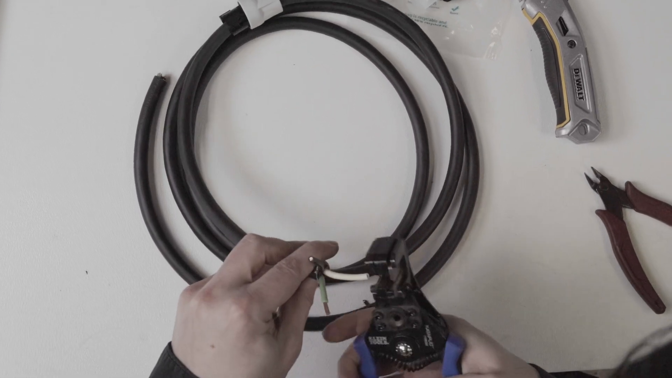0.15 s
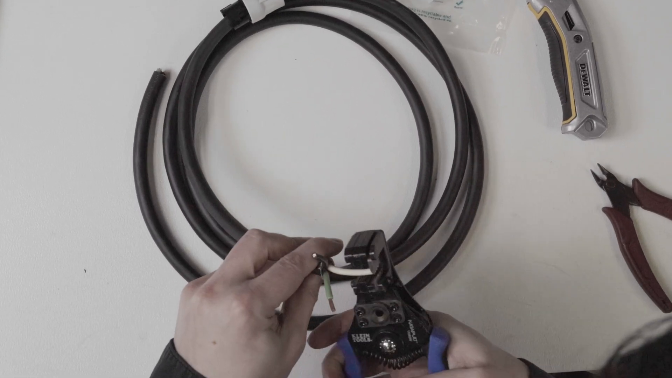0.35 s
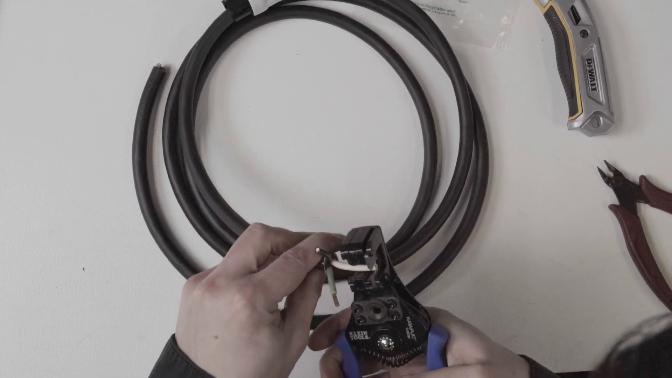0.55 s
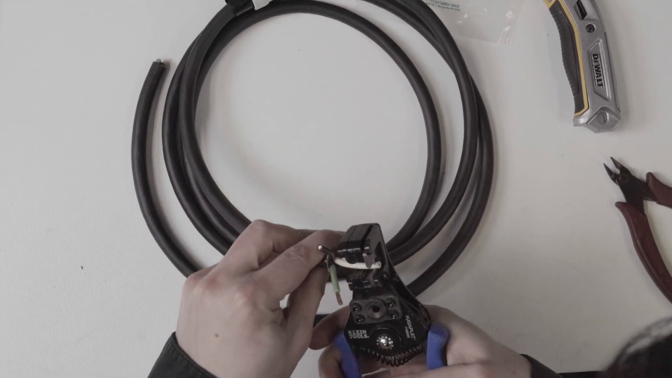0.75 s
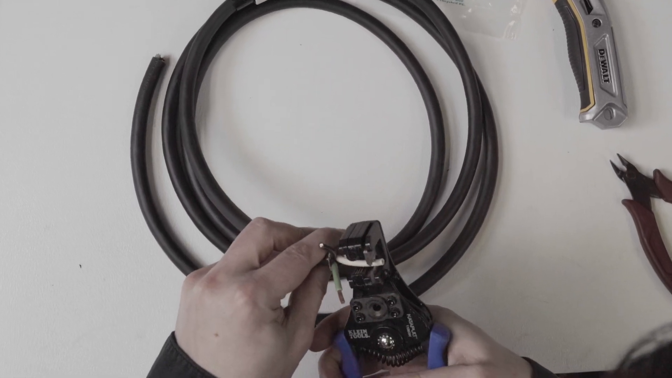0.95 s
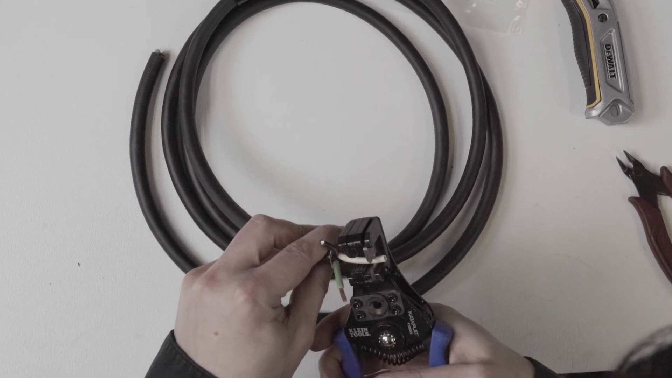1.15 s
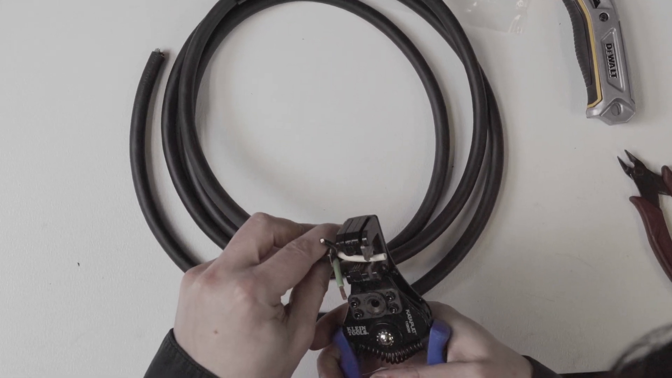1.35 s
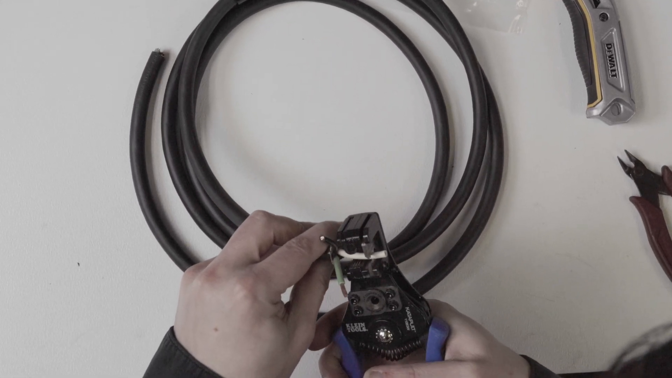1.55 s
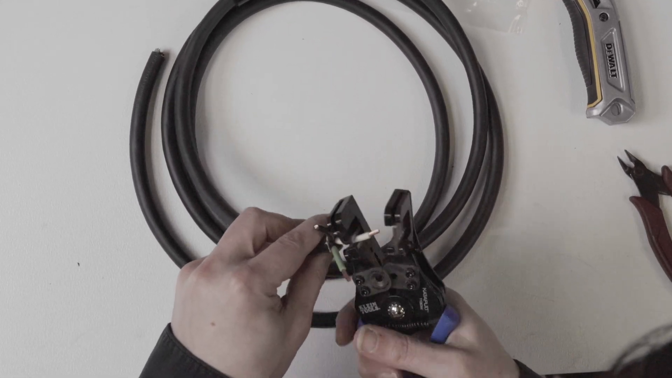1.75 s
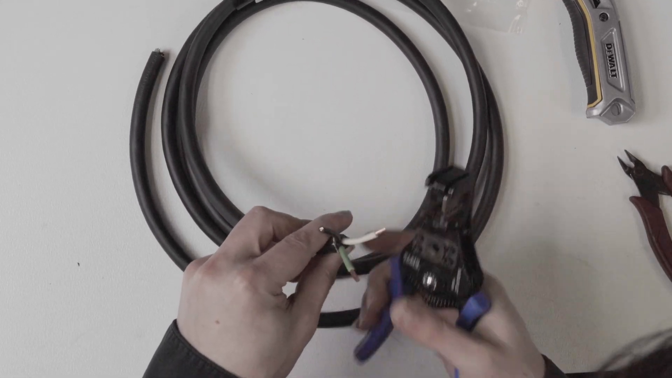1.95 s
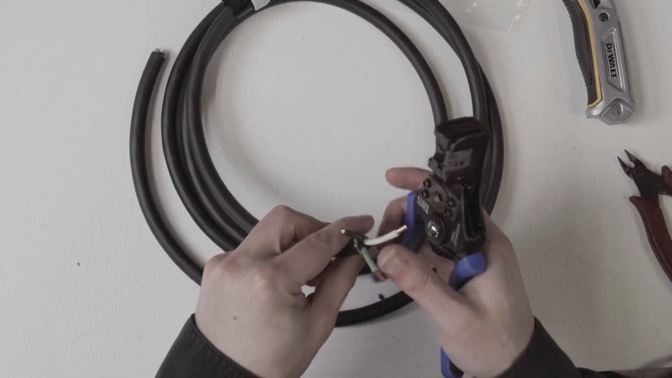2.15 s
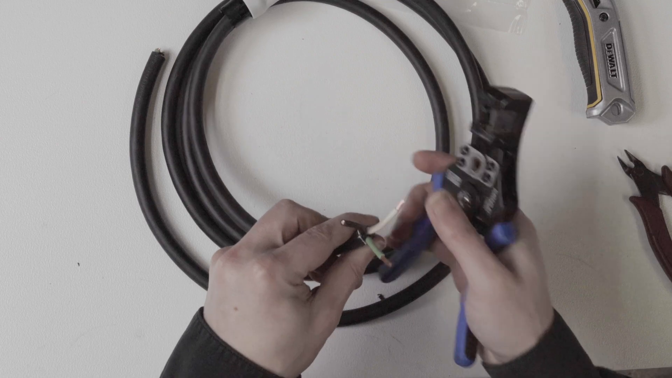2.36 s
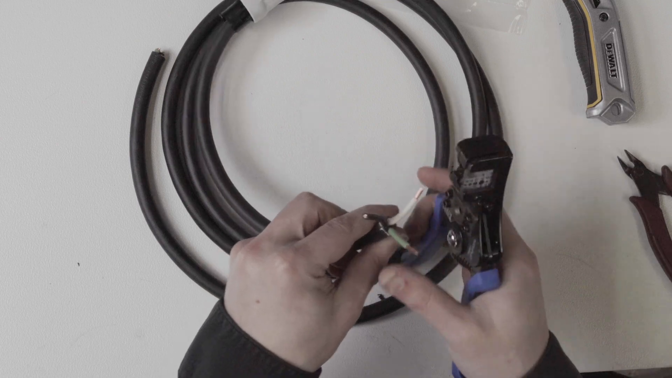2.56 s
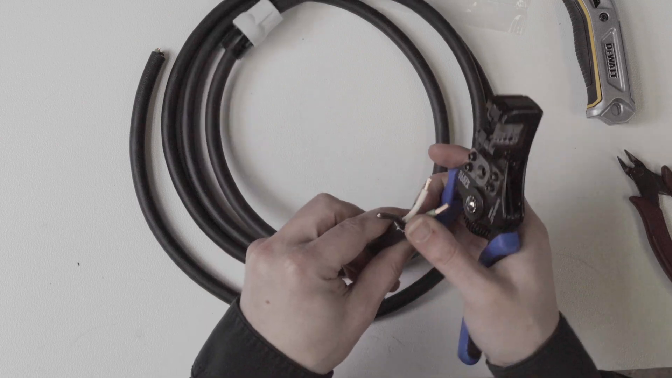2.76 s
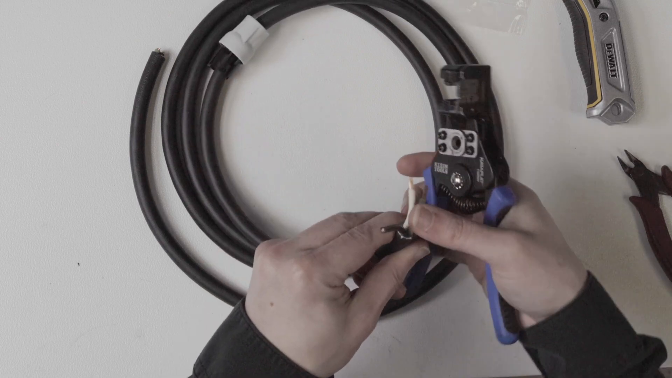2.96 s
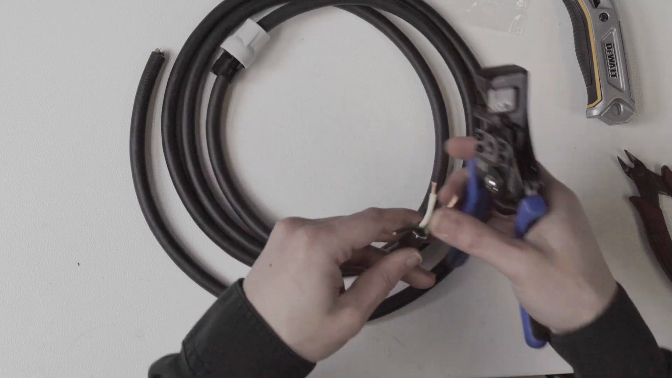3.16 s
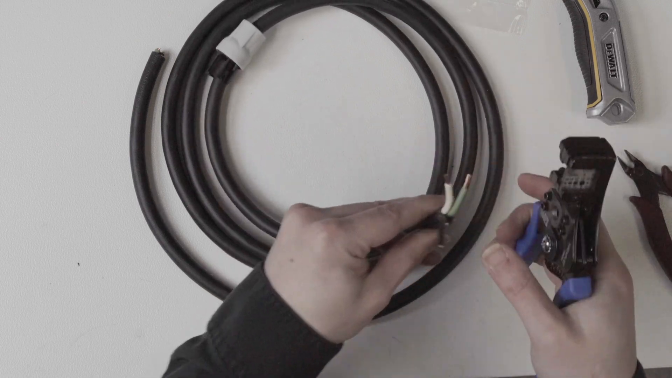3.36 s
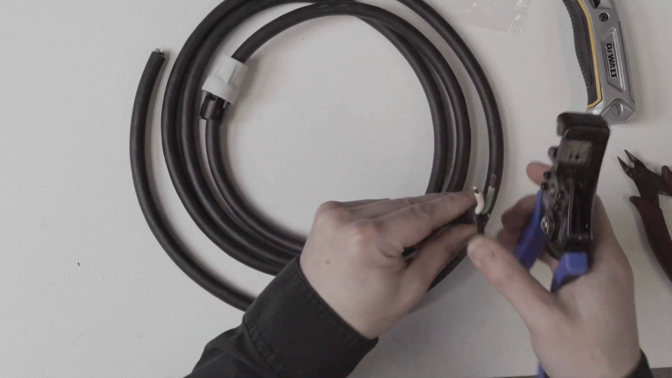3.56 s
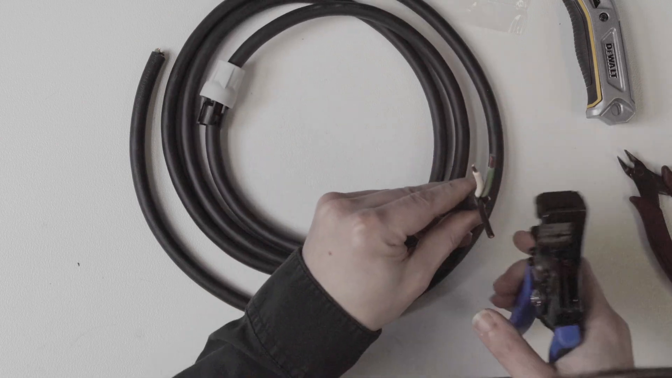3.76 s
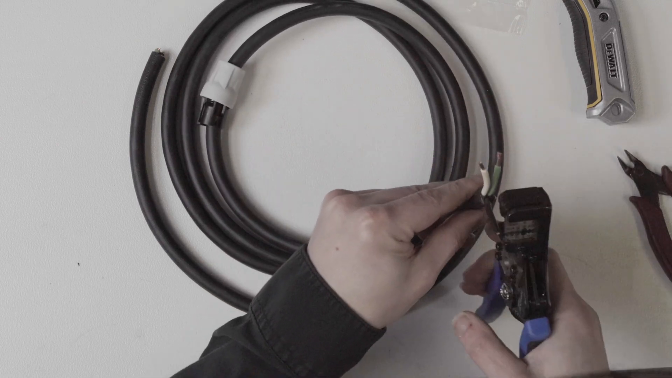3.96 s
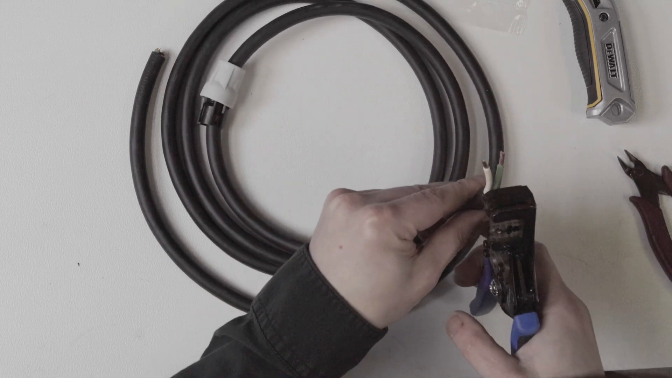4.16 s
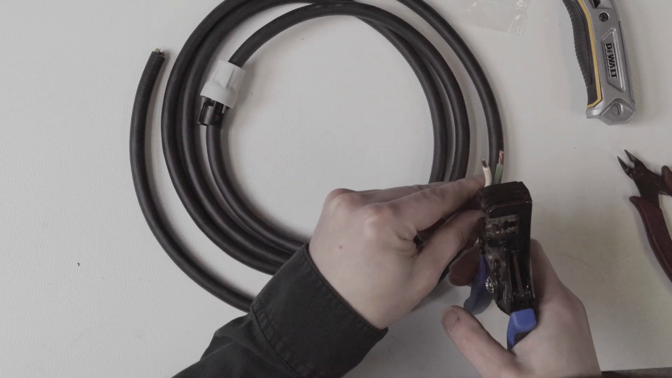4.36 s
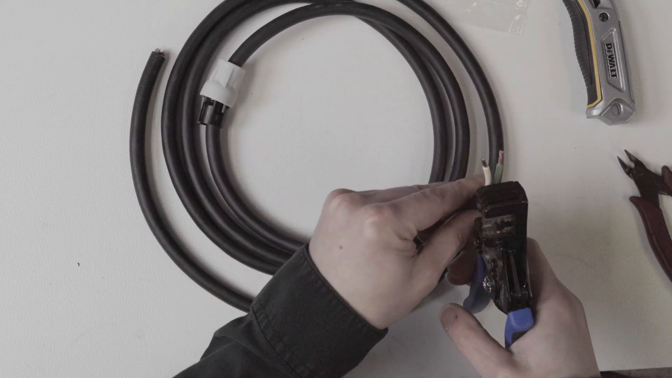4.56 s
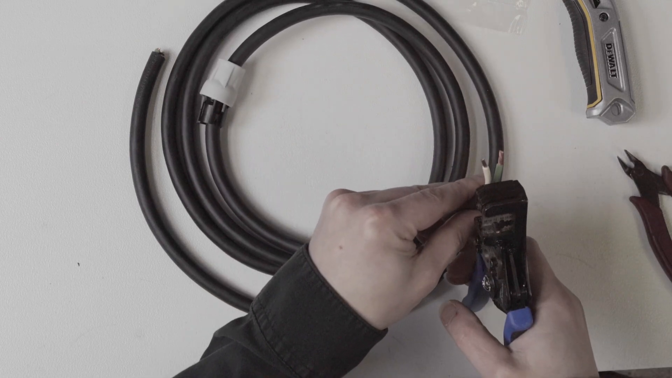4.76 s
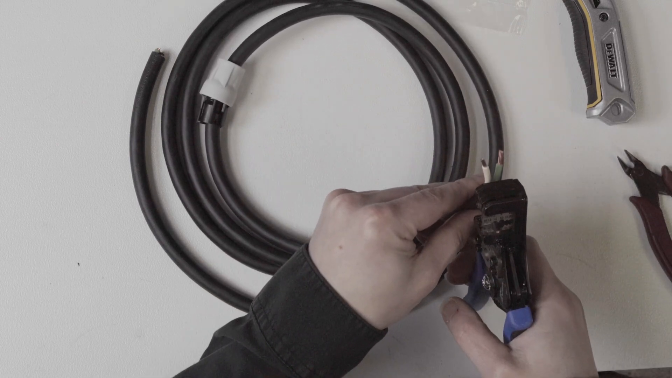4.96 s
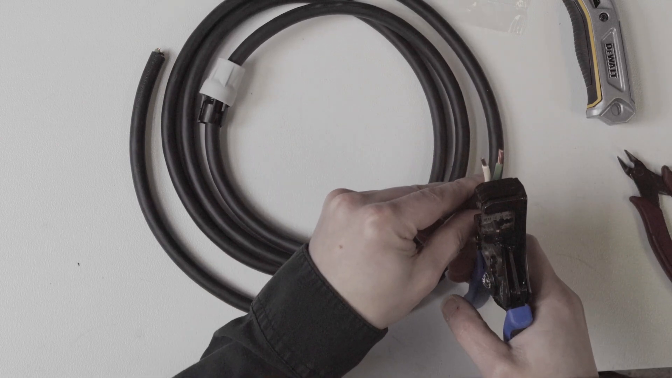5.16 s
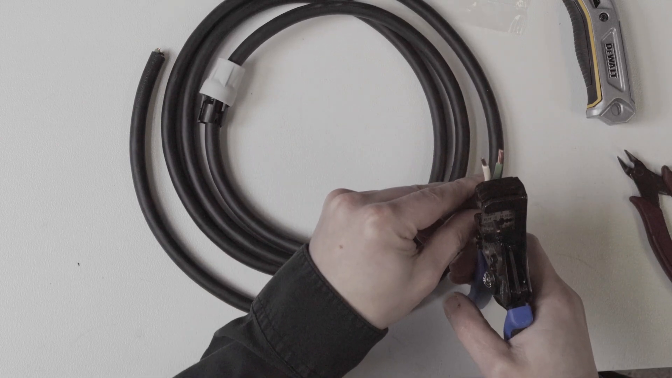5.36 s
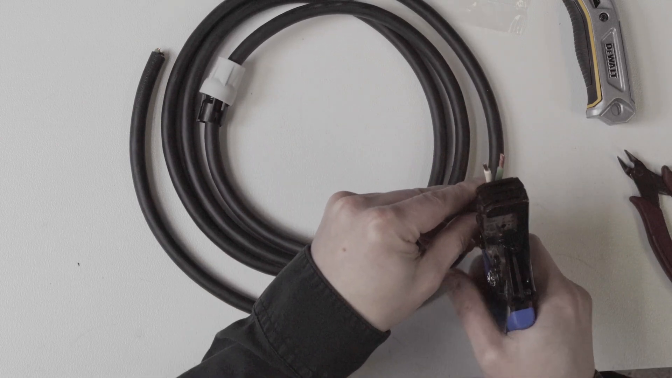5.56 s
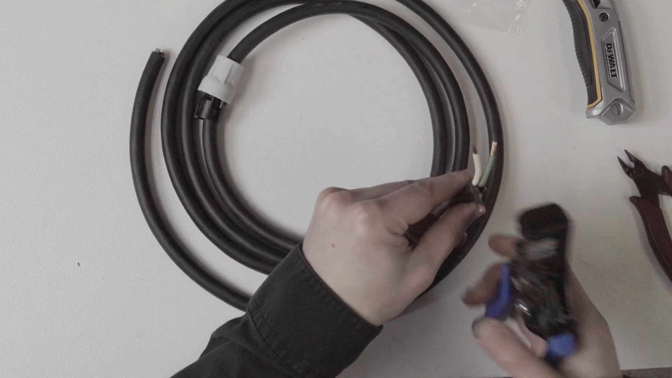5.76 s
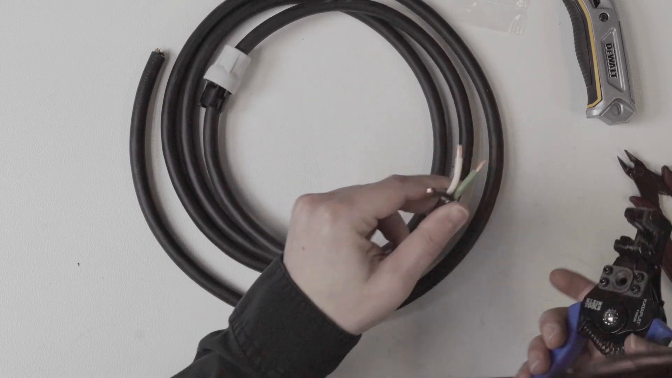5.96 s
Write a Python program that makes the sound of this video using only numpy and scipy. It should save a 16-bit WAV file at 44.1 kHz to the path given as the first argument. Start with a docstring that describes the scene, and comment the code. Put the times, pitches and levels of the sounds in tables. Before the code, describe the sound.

Two sharp metallic snap-and-slam strokes of a spring-loaded stripping tool, four seconds apart, amid tiny ticks in a hushed small room.

```python
"""Faint hum and light clicks of a hand tool, then a hard snap, a rattle and a slam; the stroke comes twice.
A spring-loaded wire stripper is worked over a table in a small, dry room.
Snaps, slams and ticks are shaped noise bursts plus damped modes of jaws and steel frame.
Between strokes the tool ticks and rattles and the cable scuffs the table (trains of tiny slips).
The hum is one sine that swells and fades; the air is coloured noise."""
import sys
import numpy as np
from scipy import signal
from scipy.fft import rfft, irfft, next_fast_len
from scipy.io import wavfile

SR = 44100
rng = np.random.default_rng(int(sys.argv[2]) if len(sys.argv) > 2 else 0)


def wav_record(signal):
    """Record a signal, one row per channel, as 16-bit PCM in the file named by sys.argv[1]."""
    frames = np.transpose(np.atleast_2d(signal))
    bounded = np.clip(frames, -1, 1)
    # unit amplitude maps onto the largest positive 16-bit level
    quanta = np.round(bounded * 32767).astype(np.int16)
    wavfile.write(sys.argv[1], SR, quanta)


N = 264600

# Event levels are relative; snaps, slams and ticks add a shared gain.
# Decays and build-ups are time constants.
# Insulation tears, jaws fly open: start_s, level_db, build_s, decay_s, clack_db, jolt_db, sway_db
SNAPS = [(1.7868, -8, .001, 0.0011, -4, -30.5, -50.5), (5.6599, -12.5, 0.00044, .0029, 2.5, -46, -49.5)]
# Spectrum of the tear: freq_hz, level_db
SNAP_COLOUR = [(100, -13.5), (700, -13.5), (1200, -12.5), (2300, -3), (3800, -9.5), (5000, -10.5),
               (6600, -3.5), (9000, -8), (12000, -5), (13400, -4.5), (16000, -13)]
# Jaw resonances, one list per snap, set by how far the jaws are open: freq_hz, width_hz, level_db
JAW_MODES = [
    [(1274.4, 207, -5), (2130, 190, -0.5), (2370, 67, 2), (3306, 87, 0.5), (5192, 110, -3.5),
     (7850, 160, -4.5), (8490, 400, -4), (10466, 270, -6.5), (12000, 220, -1.5)],
    [(785, 85, -14.5), (1157, 74, -11), (2010, 170, -3.5), (2430, 180, 1), (4230, 140, -5), (6370, 410, -8),
     (7540, 250, -2.5), (8460, 220, -2.5), (9300, 150, -2), (10270, 140, -2)],
]
# Spring slams the steel jaws shut: start_s, level_db, decay_s, ring_db, chatter_db, jolt_db, sway_db
SLAMS = [(1.9182, -1, 0.0015, -13, -7, -48, -65.5), (5.7894, -2.5, 0.0018, -15.5, -7, -46.5, -36.5)]
# Spectrum of the blow, one list per slam: freq_hz, level_db
SLAM_COLOURS = [
    [(100, -18), (1200, -17), (2100, -13.5), (2550, -1.5), (3300, -7.5), (4400, -9.5), (5900, -2),
     (7100, -3.5), (7750, 0), (9600, -7.5), (10800, 0), (11900, -11.5), (13000, -3.5), (15000, -8)],
    [(100, -12), (1300, -23.5), (2400, -10), (3700, -10), (5200, -12.5), (6600, 0.5), (8200, -3.5),
     (9700, -9), (10700, -3), (12800, -8.5), (14600, -1), (16000, -13.5)],
]
# Linkage catches passed on each return: before_slam_s, level_db, decay_s, tilt_db_per_octave
CATCHES = [(.045, -36, .003, 4), (.0368, -27, 0.0018, 6.5), (.0275, -17.5, .0017, 5),
           (.0112, -27, .003, 4.5), (.005, -30, .003, 3)]
# Modes of the steel frame: freq_hz, level_db, t60_s
STEEL_MODES = [(2414, -8, .06), (2649, -1, .09), (3239, -4, .11), (3928, -3, .1), (5253, -5, .11),
               (5895, 0, .07), (6220, -4, .1), (6796, -1, .08), (7778, 1, .06), (8190, -4, .09),
               (10600, 0, .06), (12645, 1, .08), (12930, -2, .06), (14320, -2, .06), (14935, -3, .07)]
# Single clicks of the tool in the hand: start_s, level_db, decay_s, tilt_db_per_octave, clack_db
TICKS = [(.0773, -42.5, 0.00075, 1.5, -13), (.564, -53, 0.0016, 10.5, -14), (.809, -59, 0.00091, 5, -26),
         (1.7111, -35.5, 0.002, -1.5, -4), (1.7205, -38.5, .0016, 0, -11), (2.0511, -43, 0.0011, 1, -17),
         (2.2041, -51.5, 0.0031, -5.5, -10.5), (2.2691, -42.5, .0019, 6.5, -17),
         (2.325, -49.5, .004, 2, -10), (2.3987, -50, 0.0023, .5, -9.5), (3.682, -56, .0016, -2, -16),
         (4.121, -60.5, .0011, -2.5, -2), (4.474, -57.5, 0.0009, 0, -18), (5.436, -56.5, 0.0049, -2, -8),
         (5.5532, -44.5, .0017, 12, -26), (5.6003, -42, 0.0019, -3.5, -9),
         (5.9392, -32.5, .0018, 1.5, -0.5)]
# Spectrum of a light contact: freq_hz, level_db
TICK_COLOUR = [(200, -15.5), (1400, -14.5), (2500, -1.5), (3800, -2), (5200, -2.5), (7500, -4), (10000, -5),
               (15500, -12)]
# Grip shifts, loose parts rattle: start_s, length_s, level_db, tilt_db_per_octave
RATTLES = [(0.067, 0.045, -59, -3), (1.699, 0.05, -58, -5), (2.26, .06, -55, -1), (2.93, .37, -58, -2),
           (5.529, .11, -56.5, -3)]
# Cable and sleeve slide on the table: start_s, length_s, level_db, tilt_db_per_octave
SCUFFS = [(0.494, .005, -64, -3.5), (0.538, 0.0077, -65.5, -7), (2.856, .017, -50, 1.9),
          (2.866, 0.12, -64, -3), (3.125, 0.058, -63, -4), (3.416, 0.32, -72, -0.5),
          (3.473, 0.15, -63.5, 0.5), (3.68, 0.032, -63, 1), (5.041, .04, -72, -5)]
# Spectrum of the sliding: freq_hz, level_db
SCUFF_COLOUR = [(100, -7.5), (280, 2.5), (450, -5), (800, -2), (1600, -7.5), (2750, -8.5), (3400, -20),
                (7000, -18), (14000, -45)]
# Swell of the hum, before and after the first stroke: time_s, level_db
HUM_SWELL = [
    [(0.0, -62), (0.406, -69), (0.668, -62.5), (1.036, -72), (1.308, -91), (1.492, -69), (1.74, -79.5)],
    [(2.05, -71), (2.83, -80), (4.38, -65), (4.72, -69), (5.04, -94), (5.35, -68.5), (5.62, -63.5)],
]
# Spectrum of the room air: freq_hz, level_db
AIR_COLOUR = [(18, -7.5), (30, 6.5), (50, -6.5), (85, -7), (160, -10), (300, -17), (620, -15), (950, -22.5),
              (1330, -20.5), (1600, -28), (3200, -34), (4600, -31.5), (12400, -37), (13500, -47)]
# Decay of the room tail: freq_hz, t60_s
ROOM_T60 = [(150, .2), (1200, 0.26), (4500, 0.29), (8000, .24), (15000, 0.091)]

HUM_HZ = 211.7
AIR_DB = -70.5
TOP_HZ = 15900


def undb(db):
    """Decibels to gain."""
    return 10 ** (np.asarray(db) / 20)


def unit(x):
    """Scale to an energy of one."""
    return x / np.sqrt(np.sum(x ** 2))


def along(points, hz):
    """Interpolate (Hz, value) points on a log-frequency axis."""
    point_hz, value = np.transpose(points)
    return np.interp(np.log(hz + 1), np.log(point_hz), value)


def colour(x, points, tilt_db=0):
    """Minimum-phase filter with the given spectrum, tilted per octave about 4 kHz."""
    size = 2 * next_fast_len(len(x))
    hz = np.fft.rfftfreq(size, 1 / SR)
    db = along(points, hz) + tilt_db * np.log2(np.maximum(hz, 400) / 4000)
    # Folding the cepstrum makes the filter causal.
    cepstrum = irfft(np.log(undb(db)))
    cepstrum[1:size // 2] *= 2
    cepstrum[size // 2 + 1:] = 0
    response = np.exp(rfft(cepstrum))
    return irfft(rfft(x, size) * response)[:len(x)]


def add(track, start_s, x):
    """Mix x into the track from start_s on."""
    start = max(int(start_s * SR), 0)
    part = x[:max(N - start, 0)]
    track[start:start + len(part)] += part


def clock(size=8192):
    """Time axis of one short event, in seconds."""
    return np.arange(size) / SR


def jitter(size, rate_hz):
    """Random values joined by straight lines, rate_hz of them a second."""
    return np.interp(clock(size) * rate_hz, np.arange(size), rng.standard_normal(size))


def crack(envelope, points, tilt_db=0, uneven=0.13):
    """Dense, quickly damped vibration after a contact; uneven (0-1): how far single resonances stand out."""
    spectrum = rfft(rng.standard_normal(len(envelope)) * envelope)
    evened = irfft(spectrum * np.abs(spectrum) ** (min(uneven, 1) - 1))
    gate = np.minimum(envelope * 20, 1)
    return unit(colour(evened * gate, points, tilt_db))


def ring(spread_db=1.5):
    """Damped modes of the steel frame; each blow lands elsewhere and shares them out differently."""
    t = clock()
    hz, db, t60_s = np.transpose(STEEL_MODES)[:, :, None]
    sign = rng.choice([-1, 1], hz.shape)
    gain = sign * undb(db + spread_db * rng.standard_normal(hz.shape))
    modes = gain * np.sin(2 * np.pi * hz * t) * np.exp(-np.log(1000) * t / t60_s)
    return unit(np.sum(modes, axis=0))


def clack(modes):
    """Broad resonances of the jaws, quickly damped by the grip."""
    t = clock()
    hz, width_hz, db = np.transpose(modes)[:, :, None]
    sign = (-1) ** np.arange(len(hz))[:, None]
    gain = sign * undb(db) * width_hz
    return unit(np.sum(gain * np.sin(2 * np.pi * hz * t) * np.exp(-np.pi * width_hz * t), axis=0))


def tick(db, decay_s, tilt_db, clack_db=-15, gain_db=12, ring_db=-14,
         clack_hz=2470, clack_width_hz=170, seat_s=.0012, grain_db=4):
    """One light, grainy contact of pivot, spring or wire rings the frame and shakes the jaws."""
    t = clock()
    grain = undb(grain_db * jitter(len(t), rate_hz=3000))
    envelope = grain * np.exp(-t / decay_s) * (1 - np.exp(-t / seat_s))
    contact = crack(envelope, TICK_COLOUR, tilt_db, uneven=1.0)
    jaw_hz = clack_hz * (1 + 0.047 * rng.standard_normal())
    jaws = clack([(jaw_hz, clack_width_hz, 0)])
    return undb(db + gain_db) * (contact + undb(clack_db) * jaws + undb(ring_db) * ring())


def slide(length_s, db, tilt_db, slips_per_s=1500, spread_db=5, jerk_db=1.5):
    """Dense train of tiny uneven slips that come in jerks; starts briskly, eases off."""
    t = clock(size=16384)
    size_db = spread_db * rng.standard_normal(len(t)) + jerk_db * jitter(len(t), rate_hz=150)
    slipping = rng.random(len(t)) < slips_per_s / SR
    slips = slipping * rng.choice([-1, 1], len(t)) * undb(size_db)
    pressure = np.sqrt(np.abs(np.sin(np.pi * np.minimum(t / length_s, 1) ** 0.55)))
    rubbing = unit(colour(slips * pressure, SCUFF_COLOUR, tilt_db))
    return undb(db) * np.sqrt(length_s * SR) * rubbing


def snaps(gain_db=13.5, ring_db=-22, lead_s=.003):
    """The tear builds up for a moment, then the jaws hit their stop and ring the frame."""
    out, t = np.zeros(N), clock() - lead_s
    for start_s, db, build_s, decay_s, *_ in SNAPS:
        tear = np.exp(-np.maximum(-t / build_s, t / decay_s))
        add(out, start_s - lead_s, undb(db + gain_db) * crack(tear, SNAP_COLOUR))
        add(out, start_s, undb(db + gain_db + ring_db) * ring())
    return out


def jaw_clacks(gain_db=13):
    """At each snap the flat jaws clack with their own resonances."""
    out = np.zeros(N)
    for (start_s, db, _, _, clack_db, *_), modes in zip(SNAPS, JAW_MODES):
        add(out, start_s, undb(db + gain_db + clack_db) * clack(modes))
    return out


def stripping(bite_s=0.0077, rebound_s=0.0046, pull_s=.003):
    """Blades bite just before each snap; then the jaws rebound and the insulation slides off the wire."""
    out = np.zeros(N)
    for start_s, *_ in SNAPS:
        add(out, start_s - bite_s, tick(db=-39.5, decay_s=0.002003, tilt_db=-4))
        add(out, start_s + rebound_s, tick(db=-28.5, decay_s=0.0022, tilt_db=4.5))
        add(out, start_s + pull_s, slide(length_s=.08, db=-58, tilt_db=1.12))
    return out


def linkage():
    """The spring pulls the linkage over its catches just before each slam."""
    out = np.zeros(N)
    for start_s, *_ in SLAMS:
        for before_s, db, decay_s, tilt_db in CATCHES:
            add(out, start_s - before_s, tick(db, decay_s, tilt_db))
    return out


def slams(gain_db=12.0, chatter_peak_s=.00225):
    """Steel hits steel: a hard crack, a short chatter of loose parts and the ring of the frame."""
    out, t = np.zeros(N), clock()
    chatter_envelope = t * np.exp(1 - t / chatter_peak_s) / chatter_peak_s
    for (start_s, db, decay_s, ring_db, chatter_db, *_), points in zip(SLAMS, SLAM_COLOURS):
        blow = crack(np.exp(-t / decay_s), points, uneven=.25)
        chatter = crack(chatter_envelope, points)
        hit = blow + undb(chatter_db) * chatter + undb(ring_db) * ring()
        add(out, start_s, undb(db + gain_db) * hit)
    return out


def thumps(jolt_hz=82, jolt_s=0.006, sway_hz=35, sway_s=.026, lead_s=.002,
           table_hz=112, table_s=.03, table_db=-58):
    """Snaps and slams jolt the hands, which sway back; a snap's cable jerk also makes the table drone."""
    out, t = np.zeros(N), clock()

    def swing(hz, decay_s):
        """Damped oscillation."""
        return np.sin(2 * np.pi * hz * t) * np.exp(-t / decay_s)

    for start_s, *_, jolt_db, sway_db in SNAPS + SLAMS:
        jolt = undb(jolt_db) * swing(jolt_hz, jolt_s)
        sway = undb(sway_db) * swing(sway_hz, sway_s)
        add(out, start_s - lead_s, jolt + sway)
    for start_s, *_ in SNAPS:
        add(out, start_s, undb(table_db) * swing(table_hz, table_s))
    return out


def ticks():
    """The tool clicks as it is set on the wire, squeezed and turned."""
    out = np.zeros(N)
    for start_s, db, decay_s, tilt_db, clack_db in TICKS:
        add(out, start_s, tick(db, decay_s, tilt_db, clack_db))
    return out


def rattles(count=5, spread_db=3.5, decay_s=.0025):
    """Each shift of the grip scatters a handful of faint ticks."""
    out = np.zeros(N)
    for start_s, length_s, db, tilt_db in RATTLES:
        for k in range(count):
            tick_s = start_s + length_s * (k + rng.random()) / count
            tick_db = db + spread_db * rng.standard_normal()
            add(out, tick_s, tick(tick_db, decay_s, tilt_db))
    return out


def scuffs():
    """The cable is shifted on the table."""
    out = np.zeros(N)
    for start_s, length_s, db, tilt_db in SCUFFS:
        add(out, start_s, slide(length_s, db, tilt_db))
    return out


def hum(steady_db=-78):
    """One low tone that slowly swells and fades over a steady floor, so it never quite vanishes."""
    t = clock(N)
    swell = undb(np.interp(t, *np.vstack(HUM_SWELL).T))
    rms = swell + undb(steady_db)
    return np.sqrt(2) * rms * np.sin(2 * np.pi * HUM_HZ * t)


def air():
    """Low rumble and thin hiss of the quiet room: coloured noise at AIR_DB RMS."""
    return undb(AIR_DB) * np.sqrt(N) * unit(colour(rng.standard_normal(N), AIR_COLOUR))


def room(x, wet_db=-15.5, early_db=-17, early_s=0.024, gap_s=0.0036):
    """Near surfaces answer within milliseconds; walls add a short diffuse tail whose top dies first."""
    t = clock(size=16384)
    hz = np.fft.rfftfreq(len(t), 1 / SR)
    spectrum = rfft(rng.standard_normal(len(t)))
    band_hz = np.array(ROOM_T60)[:, 0]
    tail = 0
    # Overlapping bands, each with its own decay.
    for (_, t60_s), own in zip(ROOM_T60, np.eye(len(ROOM_T60))):
        share = along(np.column_stack([band_hz, own]), hz)
        tail = tail + irfft(spectrum * share) * np.exp(-np.log(1000) * t / t60_s)
    early = rng.standard_normal(len(t)) * np.exp(-t / early_s)
    arrival = 1 - np.exp(-(t / gap_s) ** 2)
    response = undb(wet_db) * unit(tail * arrival) + undb(early_db) * unit(early * arrival)
    return x + signal.fftconvolve(x, response)[:N]


def scene(scattered=.35):
    """Tool and cable in the room, over hum and air; jaws face the microphone, so few clacks reach the walls."""
    clacks = jaw_clacks()
    strokes = snaps() + stripping() + linkage() + slams()
    handling = ticks() + rattles() + scuffs()
    tool = room(strokes + handling + scattered * clacks) + (1 - scattered) * clacks
    return (tool + thumps() + hum() + air())[None]


def record(dry):
    """The recorder cuts the top: steep elliptic low-pass at TOP_HZ."""
    low_pass = signal.ellip(8, .2, 80, TOP_HZ, fs=SR, output="sos")
    return signal.sosfilt(low_pass, dry)


dry = scene()
out = record(dry)
wav_record(out)
```